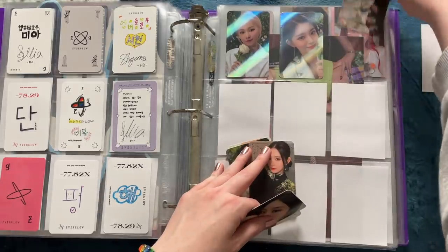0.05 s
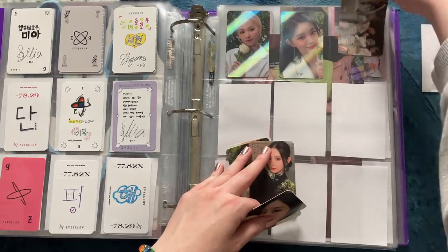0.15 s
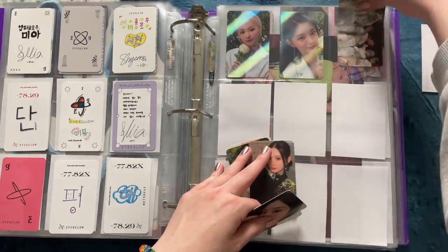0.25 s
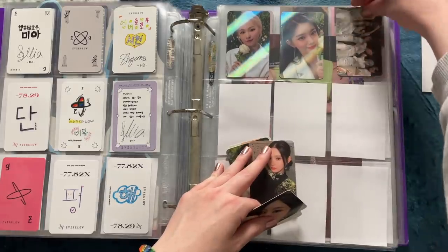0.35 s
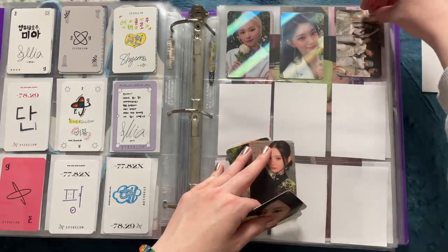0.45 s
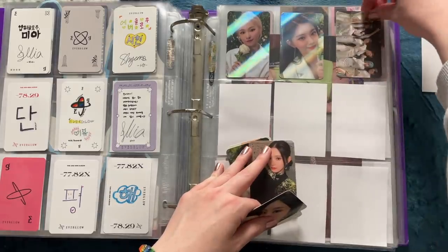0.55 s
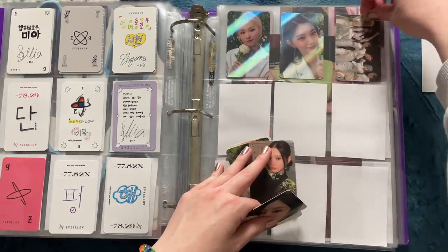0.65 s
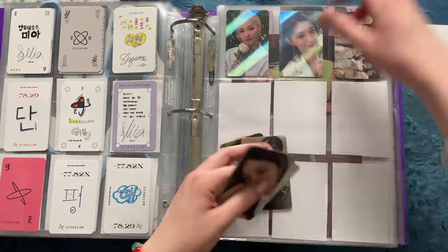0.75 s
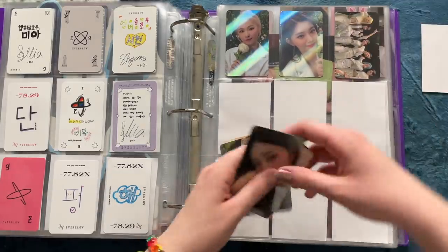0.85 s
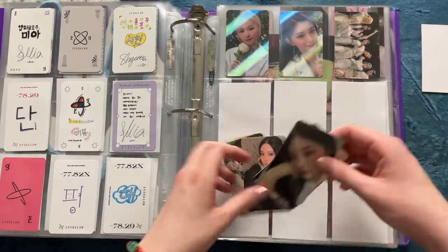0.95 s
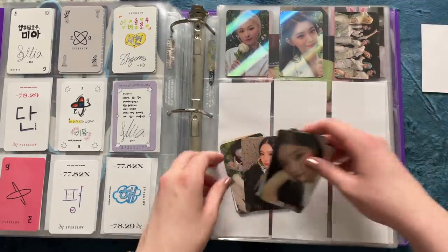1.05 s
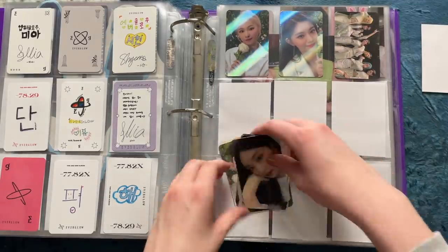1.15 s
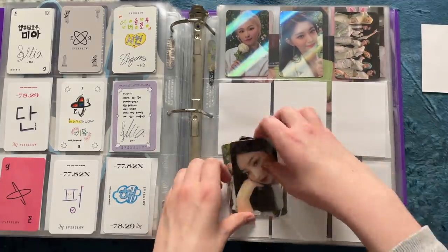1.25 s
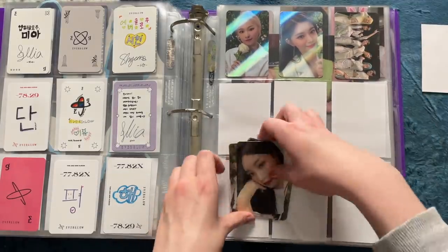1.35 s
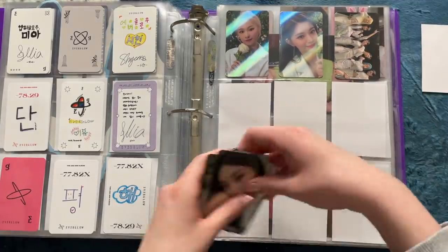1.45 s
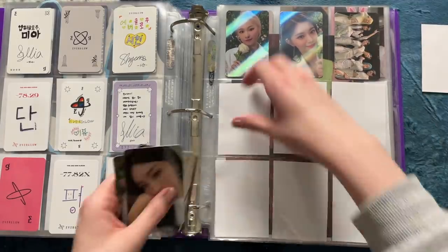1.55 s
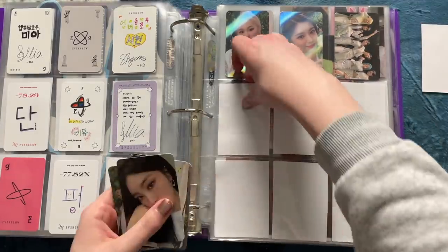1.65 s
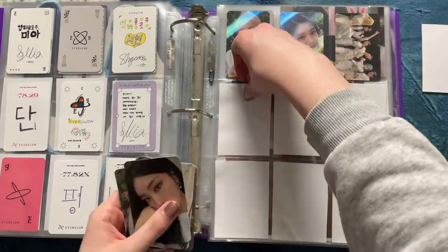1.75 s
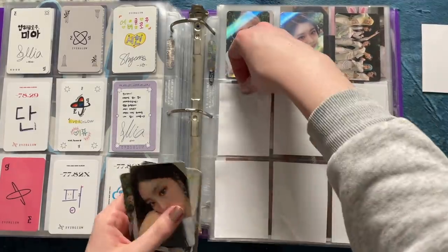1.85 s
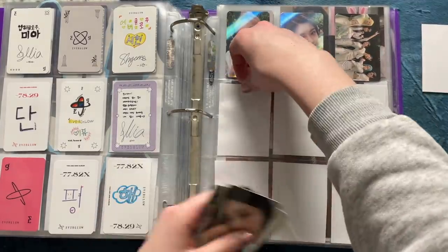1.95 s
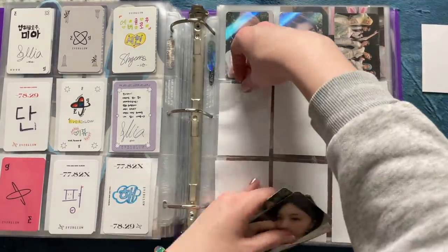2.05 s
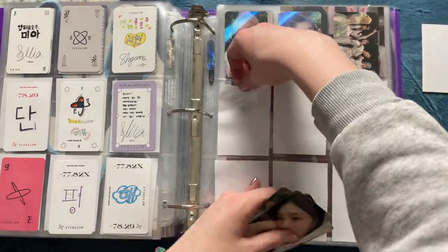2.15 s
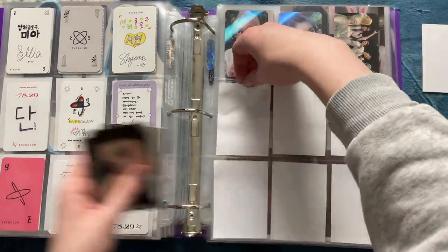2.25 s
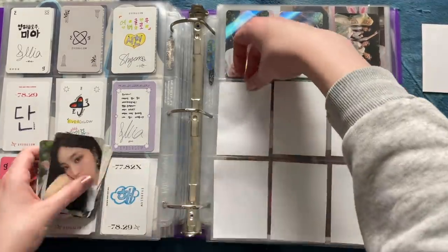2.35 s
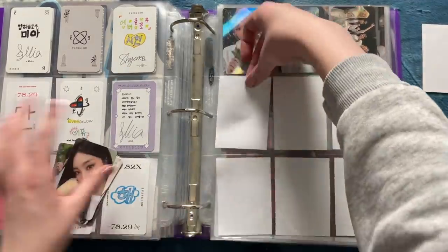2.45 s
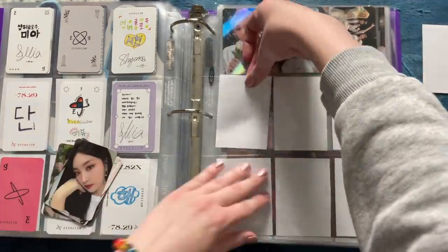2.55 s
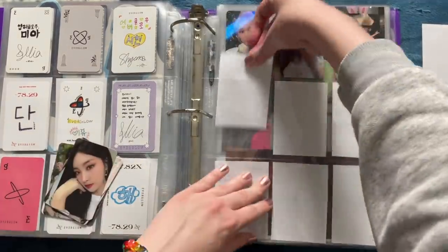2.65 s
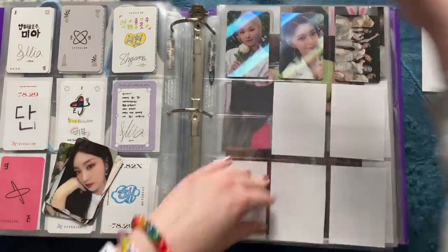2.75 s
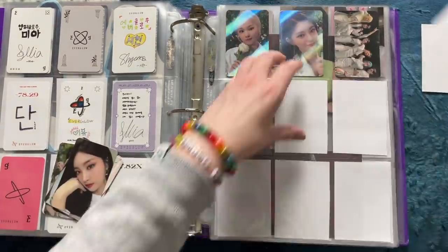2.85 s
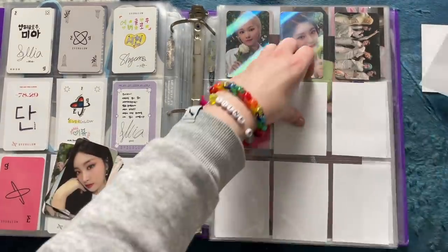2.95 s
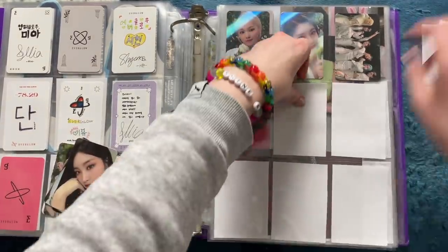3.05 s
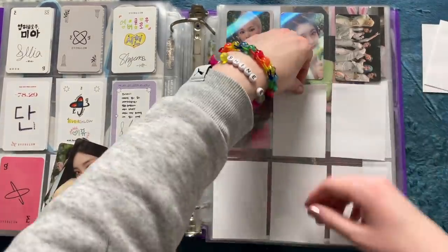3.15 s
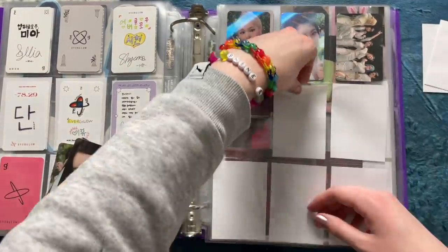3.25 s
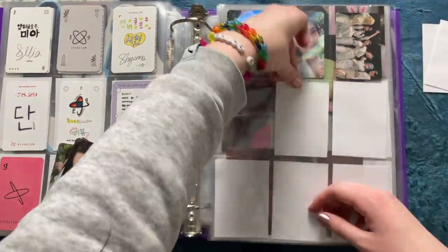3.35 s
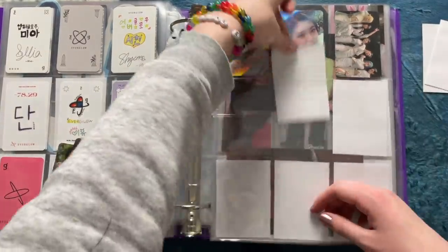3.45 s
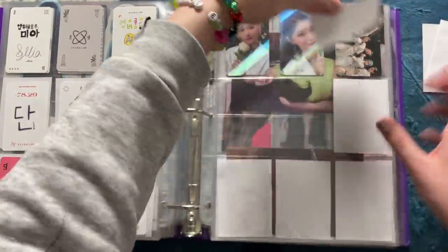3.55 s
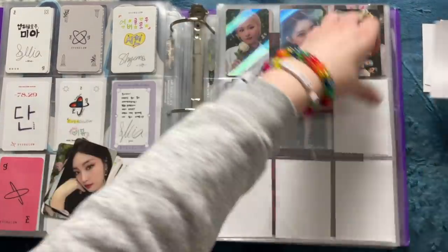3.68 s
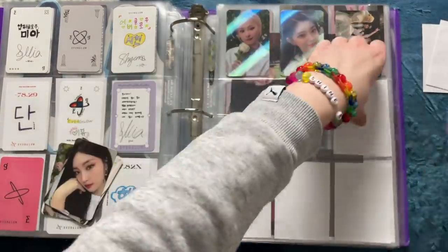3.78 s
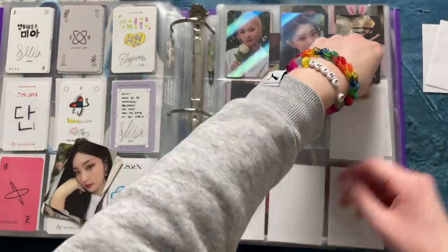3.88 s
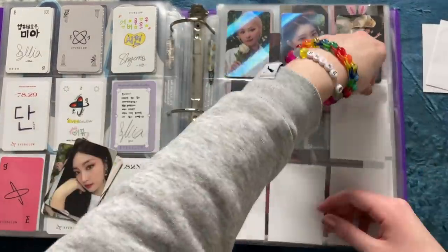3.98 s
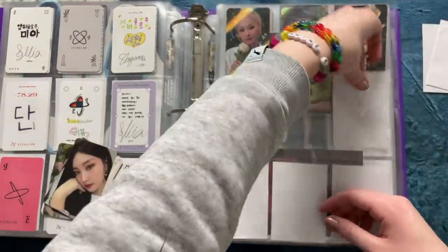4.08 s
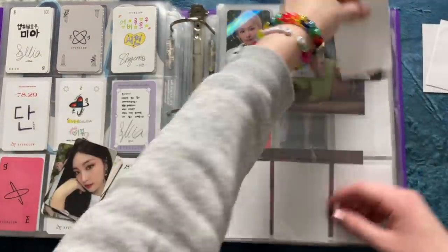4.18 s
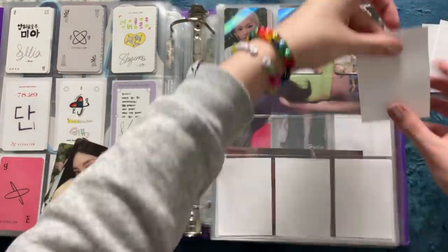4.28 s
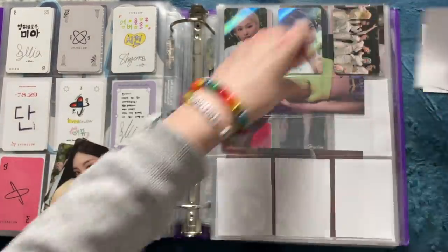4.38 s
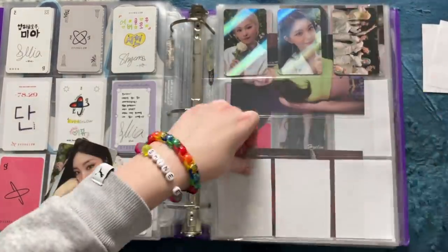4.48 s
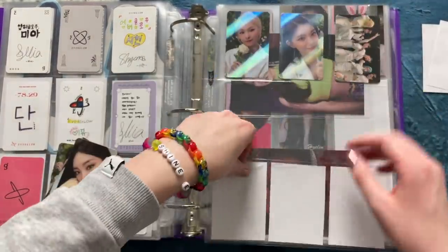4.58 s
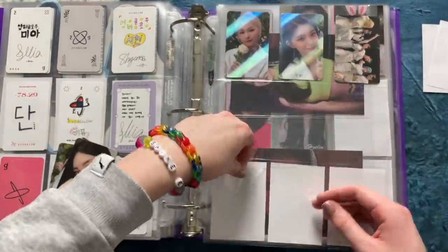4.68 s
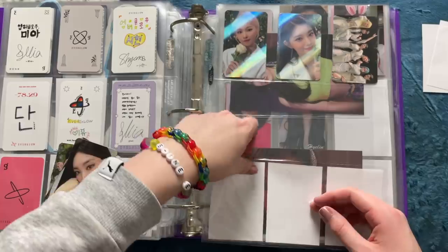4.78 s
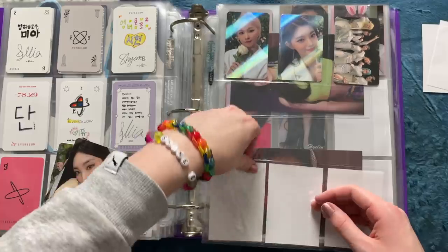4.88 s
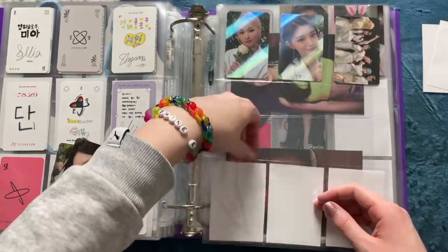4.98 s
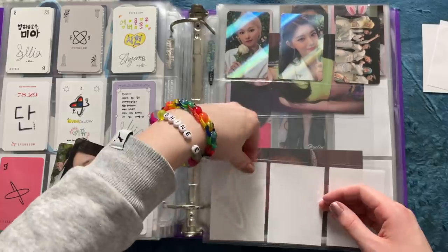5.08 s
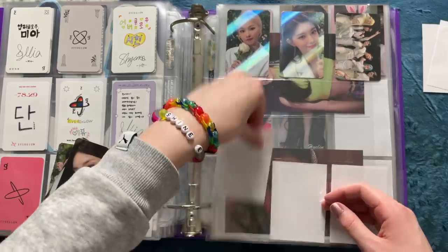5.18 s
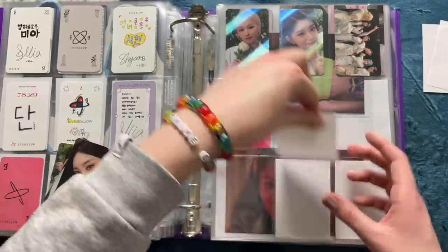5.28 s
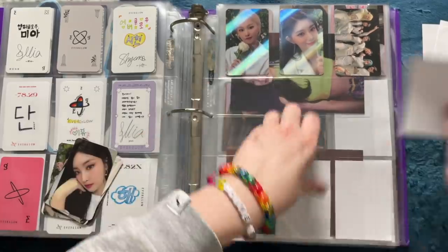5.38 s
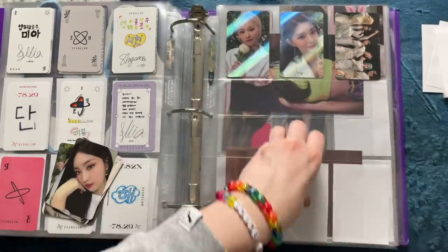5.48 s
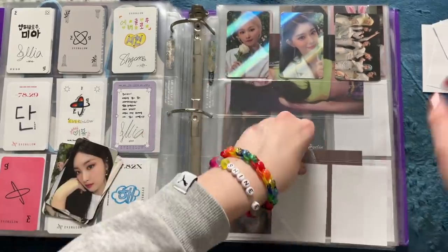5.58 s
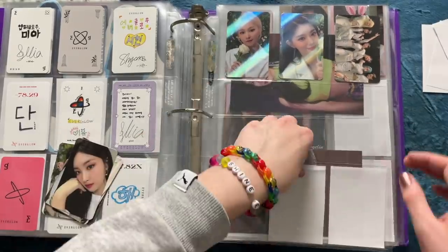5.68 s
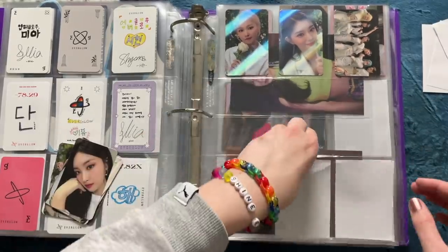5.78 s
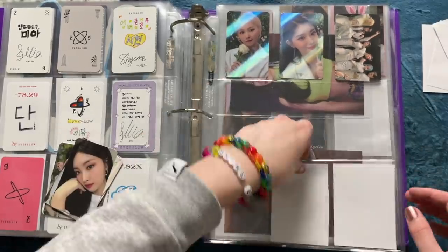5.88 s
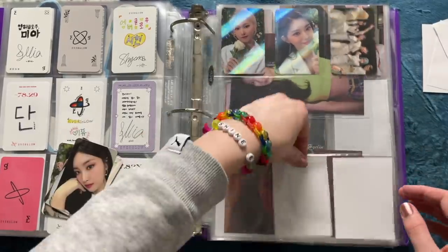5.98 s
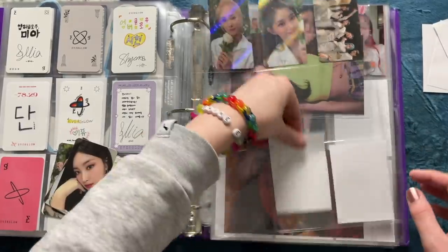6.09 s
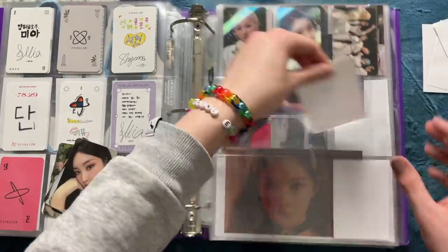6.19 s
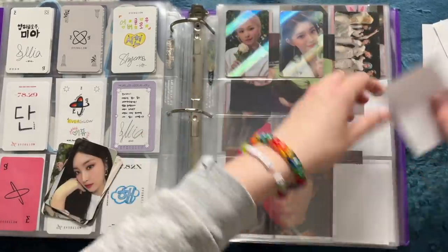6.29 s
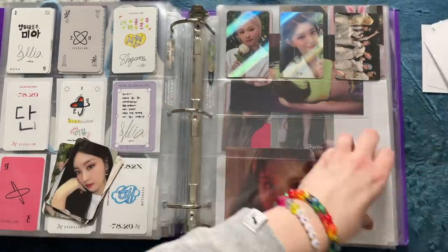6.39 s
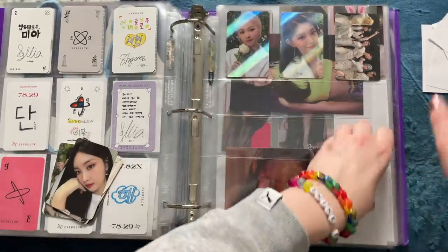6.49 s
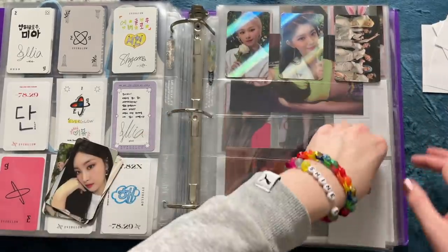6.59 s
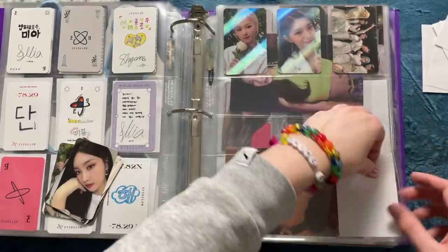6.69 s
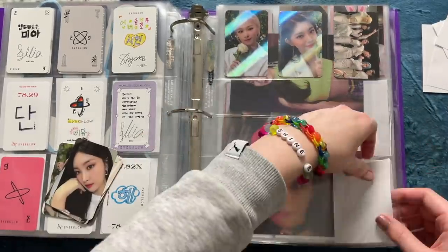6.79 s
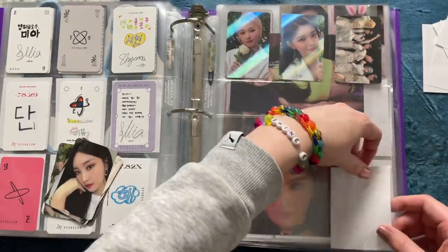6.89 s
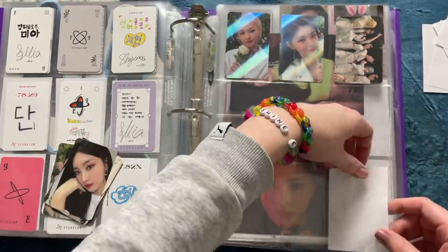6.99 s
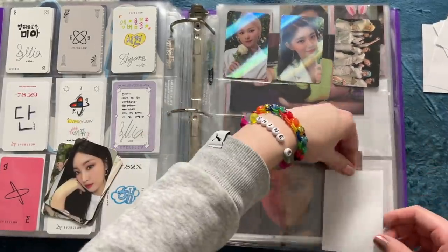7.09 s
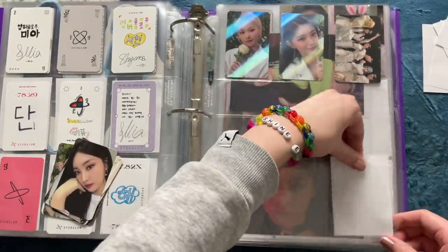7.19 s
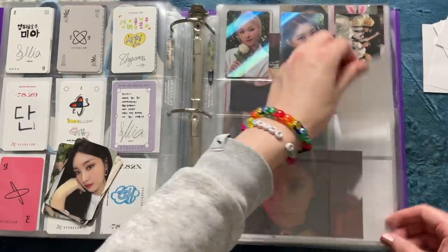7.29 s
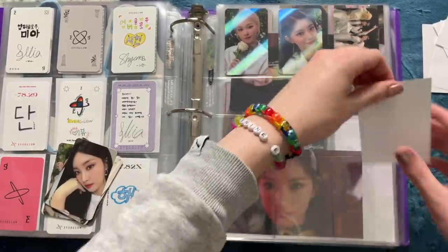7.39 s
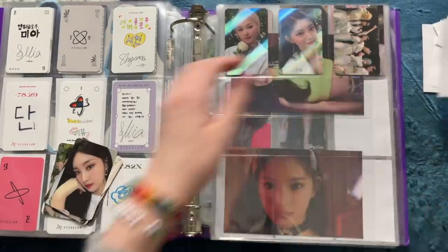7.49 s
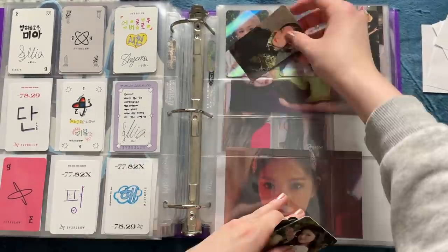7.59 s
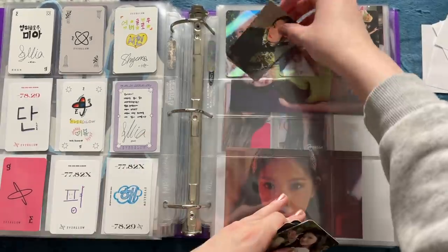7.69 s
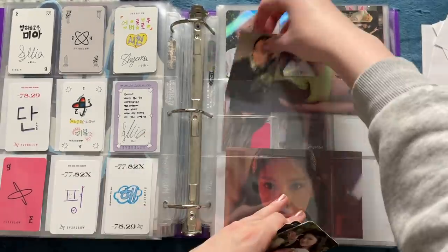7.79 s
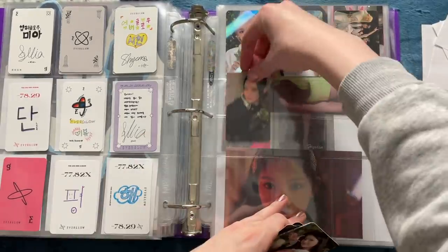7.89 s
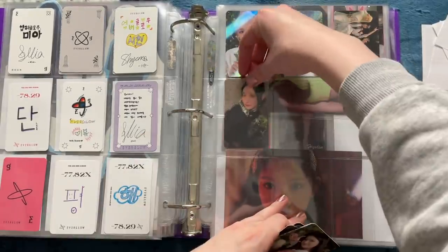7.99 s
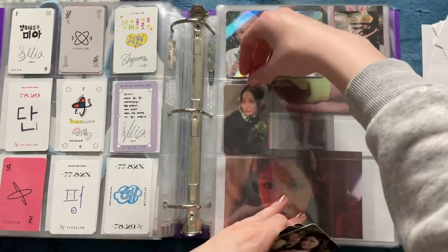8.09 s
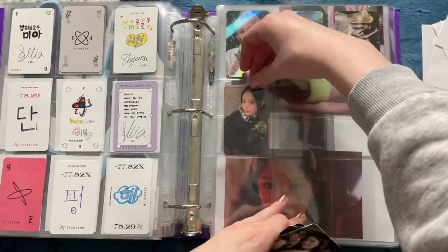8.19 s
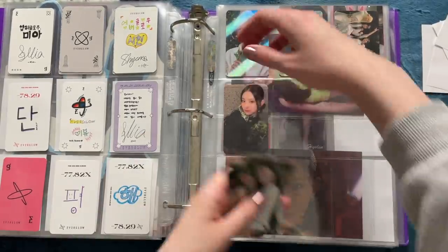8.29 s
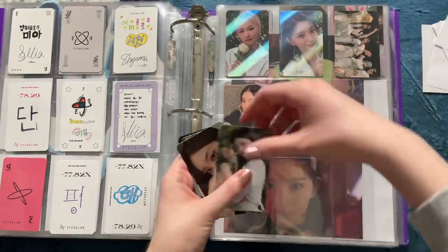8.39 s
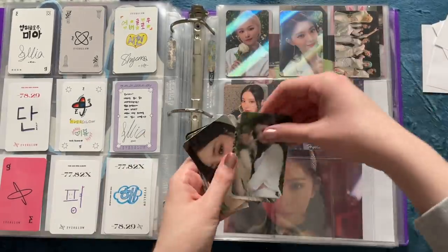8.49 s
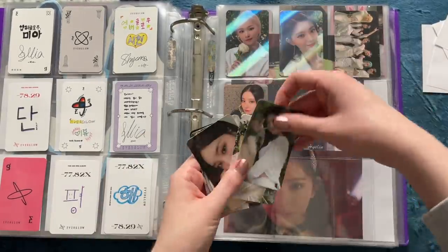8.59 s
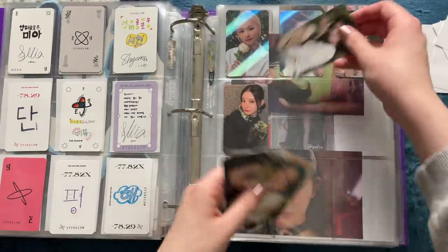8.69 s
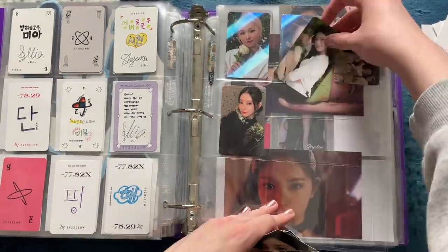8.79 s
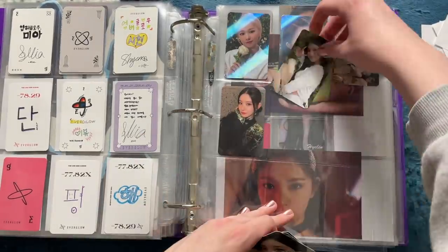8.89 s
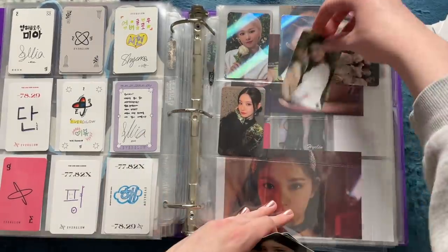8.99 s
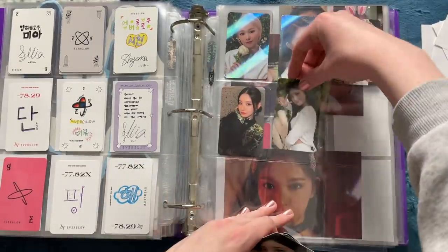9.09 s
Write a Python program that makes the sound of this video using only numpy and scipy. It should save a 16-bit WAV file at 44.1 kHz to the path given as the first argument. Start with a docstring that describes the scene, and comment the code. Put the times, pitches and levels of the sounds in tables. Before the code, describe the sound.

Thin cards slide and scuff in plastic binder sleeves, with crinkles, sharp film snaps and flat papery slaps in a small quiet room.

```python
"""A sheet slaps down on a page, then cards slide in and out of a ring binder's plastic pocket pages.
Card on film: drifting friction noise with fine crinkles and hollow knocks, and short grainy scuffs.
Blows: film snaps, sheet slaps and light taps are coloured noise bursts under contact envelopes.
Hand bumps on the binder ring two low modes. A small quiet room adds short reflections and steady air noise."""
import sys
import numpy as np
from scipy import signal
from scipy.fft import rfft, irfft, next_fast_len
from scipy.io import wavfile
from scipy.ndimage import uniform_filter1d

SR = 44100
rng = np.random.default_rng(int(sys.argv[2]) if len(sys.argv) > 2 else 0)


def transcribe(signal):
    """Save signal, clipped to [-1, 1], as a 16-bit WAV file at the path in sys.argv[1]."""
    frames = np.atleast_2d(signal).T
    limited = np.clip(frames, -1, 1)
    pcm = np.round(limited * 32767).astype(np.int16)
    wavfile.write(sys.argv[1], SR, pcm)


N = 403074

# Event levels are those before stereo placement; level_db of a short sound is its rms as if over 10 ms.
# One push of a card or hand along the film; lightness is treble over body:
# start_s, length_s, level_db (halfway), growth_db (start to end), lightness_db
PUSHES = [(0.0, 0.364, -58.5, 7.5, 3.5), (1.93, 0.077, -43.5, -23, 8), (2.216, 0.25, -55.5, 4, 4),
          (2.685, 0.07, -48.5, -3, -0.5), (2.832, 0.13, -51.5, 1, 8), (3.024, 0.15, -61.5, 17, 12),
          (3.284, 0.1, -65.5, -11, -7), (3.41, 0.17, -55, -2.5, 1), (4.065, 0.24, -49, -4, 2),
          (4.717, 0.2, -53.5, 9.5, 1), (5.059, 0.22, -48.5, 16, 4.5), (5.87, 0.17, -56, 1, -2.5),
          (6.026, 0.2, -49, -4, 0), (6.544, 0.14, -58.5, -8, 2), (6.724, 0.21, -54.5, 10.5, -2),
          (6.97, 0.17, -55.5, -4, -3.5), (7.159, 0.16, -46.5, 2, -0.5), (7.772, 0.45, -65.5, -18, 15.5)]
# Card edge scuffs a short way, one sheet resonance: middle_s, level_db, centre_hz
SCUFFS = [(0.129, -50, 3600), (0.364, -43, 6200), (0.649, -59, 9600), (0.754, -45, 3800),
          (0.919, -60.5, 6000), (1.104, -58.5, 8260), (1.262, -45.5, 5300), (1.3, -52.5, 5150),
          (1.412, -57, 4930), (1.476, -58.5, 3980), (1.529, -56, 2800), (2.425, -41, 2100),
          (2.474, -43, 750), (2.631, -50.5, 4930), (2.697, -38.5, 3150), (2.88, -44.5, 1940),
          (3.045, -46.5, 3130), (4.369, -44, 950), (4.485, -47.5, 2020), (5.836, -52.5, 3620),
          (6.225, -49.5, 448), (6.433, -38, 2060), (6.82, -43.5, 730), (6.956, -46.5, 680),
          (7.357, -36, 2410), (8.177, -52, 3460), (8.589, -49.5, 3050), (8.678, -46, 2800),
          (8.86, -55, 6500), (9.003, -54.5, 6000), (9.062, -48, 5740), (9.125, -46.5, 7600)]
# Film buckles: start_s, level_db, page_body_db, crisp_edge_db
SNAPS = [(1.8036, -32, -1, 6), (2.663, -33.5, -14.5, -22), (3.061, -39, 1.5, 22.5), (3.18, -34.5, 0, 20),
         (3.312, -34.5, -11, 4.5), (3.3258, -35.5, -11, 4), (3.481, -26, -0.5, 27), (3.9533, -37, -16, 8.5),
         (4.1167, -27.5, 5, 15.5), (4.1832, -32, -25, 7), (4.6615, -39, -1.5, 10),
         (4.7736, -32.5, -24, -13), (4.86, -35.5, 3.5, 1), (4.9424, -29.5, -13, 4),
         (4.971, -27.5, -10, 7.5), (5.2228, -29, -12.5, 7.5), (5.6158, -32, -5.5, 13),
         (5.714, -33.5, -9, 12.5), (5.9061, -27, -28, -8), (6.15, -35, -8, 6.5), (6.3088, -24, -11.5, -13),
         (6.3542, -19.5, -13.5, 4.5), (6.756, -33, -4.5, -13), (6.9, -37, -3.5, 1), (7.0526, -37, -7, 14.5),
         (7.242, -35.5, -33, -6), (7.3023, -28, -24, 1.5), (7.463, -35.5, -2, -7),
         (7.693, -41.5, -23, 15.5), (7.7644, -36.5, 2.5, 18), (8.1497, -41.5, -17, -3),
         (8.2942, -45.5, -2, 18.5), (8.777, -39.5, -5, -7)]
# Card or pocket flaps against the page: start_s, level_db, page_body_db, crisp_edge_db, contact_ms
SLAPS = [(0.0, -35, -18.5, 9, 7.6), (1.943, -32, -27, 20, 1.4), (2.478, -42.5, -2, -24, 0.99),
         (2.746, -36, -33, 3, 2.1), (2.768, -31, -21.5, -15, 6.9), (3.5549, -25, -24.5, -6.5, 5),
         (3.6673, -26.5, -25, -8, 1.95), (3.694, -18.5, -19, 7.5, 1.53), (4.232, -36.5, -27, 2, 5.6),
         (4.385, -19, -25, -1.5, 3.05), (5.383, -25.5, -28.5, -16.5, 3.6), (5.413, -35, -19, 2.5, 3.2),
         (5.972, -33, -14.5, -6, 2), (6.316, -20, -24, 2, 2.1), (6.777, -36.5, -20.5, -24, 2.2),
         (7.474, -31.5, -21, -4, 4.6), (8.704, -35.5, -27.5, -1, 3.3)]
# Fingertip or card corner touches down: start_s, level_db, centre_hz
TAPS = [(0.448, -48, 1950), (0.514, -58.5, 5030), (0.893, -55, 4670), (0.962, -44.5, 2720),
        (1.028, -56.5, 4950), (1.346, -53.5, 5460), (1.4595, -51, 4070), (1.674, -55.5, 1070),
        (1.714, -56.5, 2000), (2.042, -50, 1950), (2.121, -50.5, 3370), (2.188, -46.5, 1900),
        (2.412, -43, 1770), (2.462, -43, 930), (2.948, -45.5, 2480), (2.99, -41, 1510), (3.704, -26, 2800),
        (3.766, -46, 2560), (3.827, -47.5, 2350), (3.852, -52, 8000), (3.869, -46.5, 6530),
        (3.896, -48, 7600), (4.095, -39, 3070), (4.104, -37, 3520), (4.113, -30.5, 3940),
        (4.2585, -41.5, 3480), (4.355, -42, 2560), (4.616, -48.5, 2070), (4.768, -39.5, 3770),
        (4.853, -39, 4200), (5.0601, -41.5, 3370), (5.158, -44.5, 3640), (5.4417, -41.5, 1250),
        (5.458, -45.5, 800), (5.474, -42.5, 900), (5.485, -44.5, 756), (5.56, -44, 6500),
        (5.9, -39.5, 3520), (5.955, -41.5, 720), (6.666, -46, 7000), (6.688, -45.5, 4500),
        (6.6975, -49.5, 4400), (6.7468, -43, 3000), (6.838, -57, 4000), (6.89, -39, 3920),
        (7.059, -48, 690), (7.631, -45, 4500), (8.469, -56, 1300), (8.948, -53.5, 7960)]
# Hand bumps the binder: start_s, peak_db
BUMPS = [(2.488, -43.5), (4.393, -40.5), (4.505, -46), (6.321, -35.5), (8.376, -49)]
# Binder modes on the table, pitch nominal: pitch_hz, level_db, t60_s
BINDER_MODES = [(131, -10.5, 0.1), (195, -5.5, 0.047)]
# Relative colour of film snaps: freq_hz, gain_db
SNAP_COLOUR = [(200, -2.5), (1400, -2.5), (2400, -3), (4000, -2), (5500, -8.5), (8000, -10.5), (15000, -21)]
# Relative colour of sheet slaps: freq_hz, gain_db
SLAP_COLOUR = [(160, 5), (380, 7), (1400, -2), (2400, -8.5), (4000, -8.5), (5500, -17), (8000, -15.5),
               (15000, -24.5)]
# Relative colour of card friction: freq_hz, gain_db
SLIDE_COLOUR = [(150, 4), (1200, -10), (2400, -5.5), (3950, 4.5), (5400, -4), (7500, -1), (10000, -7),
                (13700, -3), (16000, -38.5)]
# Hand at the outer pockets, off to the side of the microphones: from_s, to_s
OUTER_POCKETS = [(3.62, 4.55), (6.25, 7.58)]
# Stereo balance at the outer pockets: freq_hz, left_minus_right_db
BALANCE = [(500, .5), (1900, -3), (5500, 6), (13000, 2)]
# Likeness of the two microphones: freq_hz, coherence (0 to 1)
LIKENESS = [(200, 0.87), (7000, 0.79), (14000, 0.48)]
# Room decay: freq_hz, t60_s
ROOM_DECAY = [(250, 0.23), (3000, 0.12), (14000, 0.21)]
# Relative colour of the room air: freq_hz, gain_db
AIR_COLOUR = [(18, -35), (97, 8.5), (223, 8), (344, 1.5), (1290, -9), (6380, -26.5), (13500, -39),
              (16000, -65.5)]

AIR_DB = -63.5  # rms
EDGE_HZ = 16400  # band limit
GRIP_S, RELEASE_S = 0.0068, 0.016  # a push takes hold, dies away
BRUSH_DB, BRUSH_UNEVEN_DB, BRUSH_HZ = -68.5, 6, 5000
CRINKLE_DB = -1
SKIRT_DB, SKIRT_MS = -11.5, 1.2  # soft noise rising and falling around contact
LEAD_S = 0.005  # time ahead of contact in a blow
TIME = np.arange(N) / SR
GRAIN_SIZE = 4096
GRAIN_HZ = np.fft.rfftfreq(GRAIN_SIZE, 1 / SR)
LONG_SIZE = next_fast_len(N, True)


def sliding(hiss_db=0.5, flex_db=-6, catch_db=-51, body_share=-0.93, middle_share=-1.09,
            edge_share=0.078, judder_db=4.5, judder_ms=40):
    """Light pushes mostly hiss; heavier contact also crinkles the film and flexes the page in hollow knocks."""
    hz = bins(LONG_SIZE)
    friction = amp(hiss_db) * hiss()
    ticks = amp(CRINKLE_DB) * crinkles()
    knocks = amp(flex_db) * flexes()
    weight = contact(body_share)
    catch = weight / (weight + amp(catch_db))
    z = rfft(friction + np.sqrt(catch) * ticks + catch * knocks, LONG_SIZE)
    z *= 1 - below(hz, 120, order=2)  # a small sheet radiates little bass
    body, edge = shelves(hz)
    middle = 1 - body - edge
    rub = silence()
    for band, share in ((body, body_share), (middle, middle_share), (edge, edge_share)):
        rub += contact(share) * irfft(z * band)[:, :N]
    # faint treble brushing throughout, pushes or not
    brush = irfft(rfft(friction + ticks, LONG_SIZE) * hz / (hz + BRUSH_HZ))[:, :N]
    # the card sticks and gives way irregularly
    judder = np.tanh(wander(judder_ms))
    return rub * amp(judder_db * judder) + brush * amp(BRUSH_DB + BRUSH_UNEVEN_DB * judder)


def hiss(patch_db=3.2, patch_ms=35, grit_db=3.8, grit_ms=2.2, count=14):
    """Gritty friction noise whose colour drifts as the contact patch moves over the film."""
    hz = bins(LONG_SIZE)
    z = microphones(rfft(noise(LONG_SIZE)), hz) * amp(read(SLIDE_COLOUR, hz))
    band = np.floor(count * hz / EDGE_HZ)
    drifting = silence()
    for k in range(count):
        drifting += irfft(z * (band == k))[:, :N] * amp(patch_db * wander(patch_ms))
    return evened(drifting * amp(grit_db * wander(grit_ms)))


def crinkles():
    """Card edge catches on the film in dense, short ticks."""
    return grains(per_s=180, spread_db=7.0, low_hz=1590, high_hz=6000, q=1.7, contact_ms=0.32, ring_ms=6.1)


def flexes():
    """Page flexes in small hollow knocks, lower and longer than the crinkles."""
    return grains(per_s=130, spread_db=6.5, low_hz=327, high_hz=2670, q=3.2, contact_ms=0.84, ring_ms=7.8,
                  spread_ms=3.89)


def grains(per_s, spread_db, low_hz, high_hz, q, contact_ms, ring_ms, spread_ms=0, count=20):
    """Random small catches, each ringing one of several page resonances, a few much larger than the rest."""
    out = silence()
    for hz in np.geomspace(low_hz, high_hz, count):
        size_db = spread_db * np.minimum(rng.exponential(size=N), 3)
        strikes = rng.random(N) < per_s / count / SR
        envelope = blow(contact_ms, ring_db=-5.5, ring_ms=ring_ms)
        grain = burst(hump(hz, q), envelope, spread_ms)
        out += signal.oaconvolve((amp(size_db) * strikes)[None], grain)[:, :N]
    return evened(out)


def contact(share):
    """Level of all the pushes, weighted by a share of their lightness."""
    level = silence()
    for s, length_s, db, growth_db, light_db in PUSHES:
        add(level, s, amp(db + share * light_db) * push(length_s, growth_db)[None])
    return level


def push(length_s, growth_db):
    """Envelope of one push: grips, gains or loses force steadily, lets go."""
    t = TIME[TIME < length_s + 6 * RELEASE_S]
    held = np.minimum(t, length_s)
    force = amp(growth_db * (held / length_s - 0.5))
    return force * -np.expm1(-t / GRIP_S) * np.exp((held - t) / RELEASE_S)


def scuffs(swell_s=0.014, q=1.38, ragged_db=4.0, friction_share=0.12):
    """Card edge brushes the film: a grainy rub that swells and fades in a few hundredths of a second."""
    out, middle_s = silence(), GRAIN_SIZE / SR / 2
    swell = np.exp(-((TIME[:GRAIN_SIZE] - middle_s) / swell_s) ** 2)
    for s, db, hz in SCUFFS:
        colour_db = hump(hz, q) + friction_share * read(SLIDE_COLOUR, GRAIN_HZ)
        add(out, s - middle_s, amp(db) * burst(colour_db, swell, ragged_db=ragged_db))
    return out


def snaps(contact_ms=0.27, ring_db=-19, ring_ms=11.8, spread_ms=2.616):
    """Film flips from one shape to another: a very short contact, then a damped ring."""
    out = silence()
    for s, db, body_db, edge_db in SNAPS:
        colour_db = sheet(SNAP_COLOUR, body_db, edge_db)
        envelope = blow(contact_ms, ring_db, ring_ms)
        add(out, s - LEAD_S, amp(db) * burst(colour_db, envelope, spread_ms))
    return out


def slaps(ring_db=-20, ring_ms=7, spread_ms=3):
    """Flat sheet lands, mostly over several milliseconds."""
    out = silence()
    for s, db, body_db, edge_db, contact_ms in SLAPS:
        colour_db = sheet(SLAP_COLOUR, body_db, edge_db)
        envelope = blow(contact_ms, ring_db, ring_ms)
        add(out, s - LEAD_S, amp(db) * burst(colour_db, envelope, spread_ms))
    return out


def taps(contact_ms=0.59, q=0.9, ring_db=-14, ring_ms=6, usual_hz=3000):
    """Fingertips and card corners touch down; the softer the contact, the longer and lower the knock."""
    out = silence()
    for s, db, hz in TAPS:
        envelope = blow(contact_ms * usual_hz / hz, ring_db, ring_ms)
        add(out, s - LEAD_S, amp(db) * burst(hump(hz, q), envelope))
    return out


def bumps(rise_s=0.0046):
    """Soft blows ring the low modes of the binder, pitch slightly different each time."""
    out, t = silence(), TIME[:SR // 4]
    for s, peak_db in BUMPS:
        ring = np.zeros(len(t))
        for hz, db, t60_s in BINDER_MODES:
            cycles = hz * rng.normal(1, 0.079) * t + rng.random()
            ring += amp(db - 60 * t / t60_s) * np.sin(2 * np.pi * cycles)
        ring *= -np.expm1(-t / rise_s)
        add(out, s - rise_s, amp(peak_db) * ring[None] / abs(ring).max())
    return out


def burst(colour_db, envelope, spread_ms=0, ragged_db=2.5, lag_ms=0.0089, step_ms=1.36):
    """Cluster of tiny contacts under an envelope, coloured by the sheet; rms 1 as if over 10 ms."""
    # the sheet touches in several uneven steps
    steps = amp(ragged_db * wander(step_ms, GRAIN_SIZE))
    left, right = rfft(noise(GRAIN_SIZE) * envelope * steps)
    # each spot on the page is nearer to one microphone
    z = np.array([left, right * delayed(GRAIN_HZ, lag_ms * rng.standard_normal())])
    # contacts give the fine ripple, the sheet gives the broad colour
    broad_db = 10 * np.log10(uniform_filter1d(abs(z) ** 2, size=240) + 1e-9)
    z = z * np.array([causal(colour_db - db) for db in broad_db])
    z = microphones(z, GRAIN_HZ)
    # bending waves are slower at low pitch: a downward chirp; the sum turns delay into phase
    z *= delayed(SR / GRAIN_SIZE, np.cumsum(spread_ms * below(GRAIN_HZ, 900, order=2)))
    # a small sheet radiates little bass
    sound = irfft(z * (GRAIN_HZ / (GRAIN_HZ - 115j)) ** 3)
    return evened(sound) * np.sqrt(SR / 100 / GRAIN_SIZE)


def blow(contact_ms, ring_db, ring_ms):
    """Envelope of a blow: soft noise rising and falling around contact, the hit, the damped sheet's ring."""
    ms = (TIME[:GRAIN_SIZE] - LEAD_S) * 1000
    u = np.maximum(ms, 0) / contact_ms
    skirt = amp(SKIRT_DB) * np.exp(-abs(ms) / SKIRT_MS)
    hit = np.e * u * np.exp(-u)  # peaks at contact_ms
    ring = amp(ring_db) * np.exp(-ms / ring_ms) * -np.expm1(-u)
    return skirt + hit + ring


def sheet(colour, body_db, edge_db):
    """Colour with more or less page body and crisp edge, in dB."""
    body, edge = shelves(GRAIN_HZ)
    return read(colour, GRAIN_HZ) + body_db * body + edge_db * edge


def shelves(hz, body_hz=1600, edge_hz=6500):
    """Shares of each frequency that belong to the page's body and the film's crisp edge."""
    return below(hz, body_hz, order=4), 1 - below(hz, edge_hz, order=6)


def hump(hz, q):
    """One broad resonance, in dB."""
    ratio = (GRAIN_HZ + 1) / hz
    return -10 * np.log10(1 + (q * (ratio - 1 / ratio)) ** 2)


def placed(x, lead_ms=0.016, inner_share=0.2):
    """Outer-pocket sound reaches the right microphone first, and its balance tilts further."""
    hz, z = bins(LONG_SIZE), rfft(x, LONG_SIZE)
    side = np.array([[0.5], [-0.5]])  # left, right
    tilt_db = side * read(BALANCE, hz)
    inner = irfft(z * amp(inner_share * tilt_db))[:, :N]
    outer = irfft(z * amp(tilt_db) * delayed(hz, side * lead_ms))[:, :N]
    at_outer = sum(1.0 * (TIME > a) * (TIME < b) for a, b in OUTER_POCKETS)
    reach = uniform_filter1d(at_outer, size=SR // 10)
    return (1 - reach) * inner + reach * outer


def room(x, wet_db=-9, build_up_s=0.003, size=16384):
    """Small furnished room: dense reflections that die within about a quarter of a second."""
    hz, t, z = signal.stft(noise(size), SR)
    _, tail = signal.istft(z * amp(-60 * t / read(ROOM_DECAY, hz)[:, None]), SR)
    left, right = rfft(tail * -np.expm1(-(TIME[:size] / build_up_s) ** 2))
    # long waves reach both microphones alike
    same = below(bins(size), 3300, order=2)
    tails = irfft([left, same * left + np.sqrt(1 - same ** 2) * right])
    wet = [signal.fftconvolve(ear, tail / np.linalg.norm(tail))[:N] for ear, tail in zip(x, tails)]
    return amp(wet_db) * np.array(wet)


def air():
    """Steady low murmur of the room's air with a faint hiss: shaped noise."""
    hz = bins(LONG_SIZE)
    z = microphones(rfft(noise(LONG_SIZE)), hz) * amp(read(AIR_COLOUR, hz))
    return amp(AIR_DB) * evened(irfft(z)[:, :N])


def microphones(z, hz):
    """Two unrelated spectra become a pair, more alike in the bass than in the treble."""
    angle = np.arccos(np.clip(read(LIKENESS, hz), 0, 1)) / 2
    mid, side = z * np.array([np.cos(angle), np.sin(angle)])
    return np.array([mid + side, mid - side])


def causal(db):
    """Minimum-phase response with these gains: rings only after the blow."""
    gain = np.log(amp(db))
    mirrored = np.r_[gain, gain[-2:0:-1]]
    return np.exp(np.conj(signal.hilbert(mirrored)))[:len(db)]


def wander(ms, size=N):
    """Random curve of rms 1, smoothed over so many milliseconds."""
    return evened(uniform_filter1d(rng.standard_normal(size), int(np.ceil(ms * SR / 1000))))


def noise(size):
    """Two unrelated white noises."""
    return rng.standard_normal((2, size))


def below(hz, corner_hz, order):
    """Gain of a low-pass."""
    return 1 / (1 + (hz / corner_hz) ** order)


def delayed(hz, ms):
    """Phase turn of a delay."""
    return np.exp(-2j * np.pi * hz * ms / 1000)


def read(points, hz):
    """Reads a table on a log-frequency axis."""
    f, value = np.transpose(points)
    return np.interp(np.log(hz + 1), np.log(f), value)


def bins(size):
    """Frequencies of a spectrum of so many samples, in Hz."""
    return np.fft.rfftfreq(size, 1 / SR)


def amp(db):
    """Decibels to gain."""
    return 10 ** (np.asarray(db) / 20)


def evened(x):
    """Scales to rms 1."""
    return x / np.sqrt(np.mean(x ** 2) + 1e-20)


def silence():
    """Empty stereo track."""
    return np.zeros((2, N))


def add(mix, s, sound):
    """Adds a sound at time s, or at 0 if s is negative."""
    part = mix[:, max(round(s * SR), 0):][:, :sound.shape[1]]
    part += sound[:, :part.shape[1]]


def scene():
    """All the handling, its reflections and the room's air."""
    handling = placed(sliding() + scuffs() + snaps() + slaps() + taps() + bumps())
    return handling + room(handling) + air()


def record(dry):
    """Full-scale limit, then the band limit."""
    lowpass = signal.firwin(255, EDGE_HZ, window=("kaiser", 9), fs=SR)
    return signal.oaconvolve(np.clip(dry, -1, 1), lowpass[None], "same")


dry = scene()
out = record(dry)
transcribe(out)
```